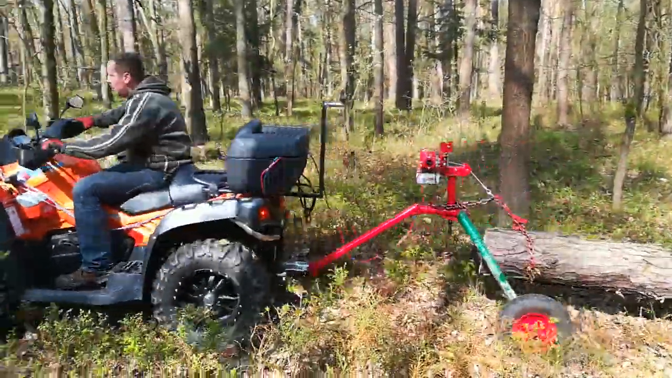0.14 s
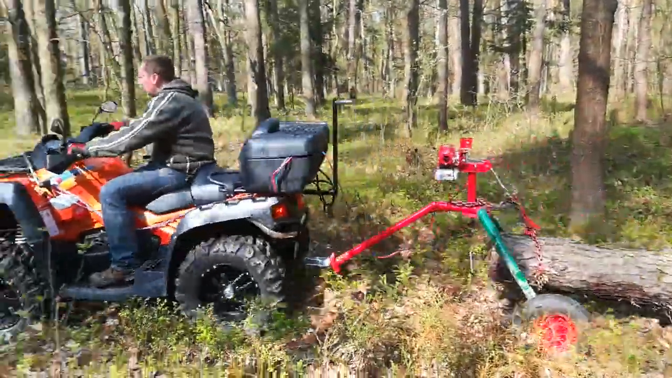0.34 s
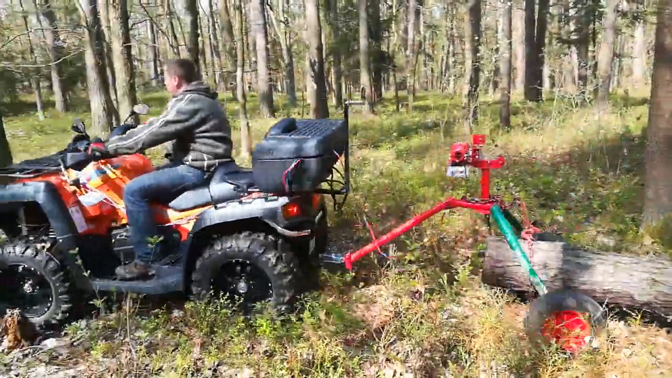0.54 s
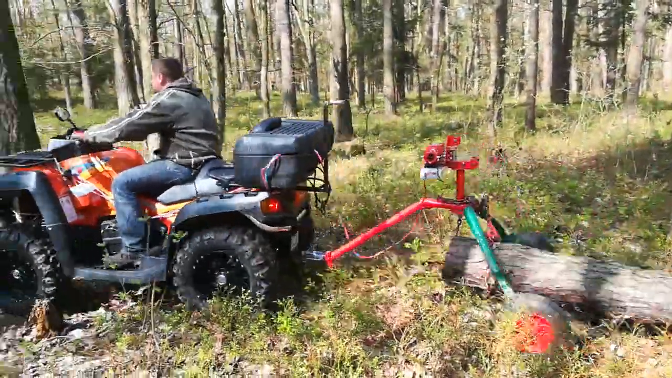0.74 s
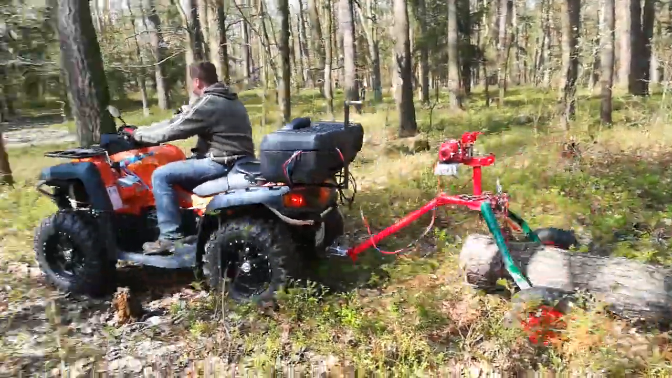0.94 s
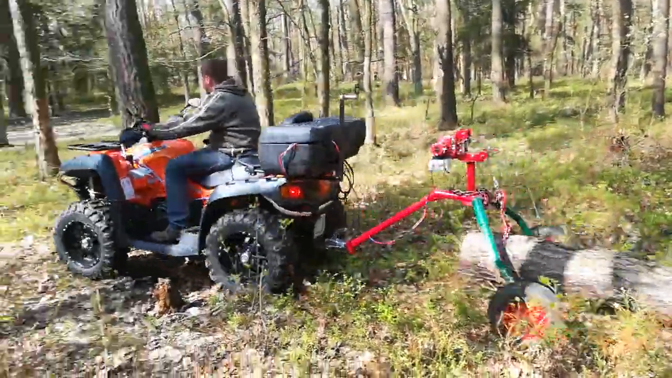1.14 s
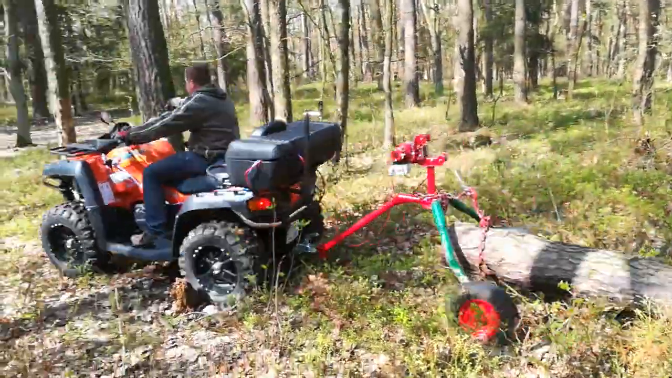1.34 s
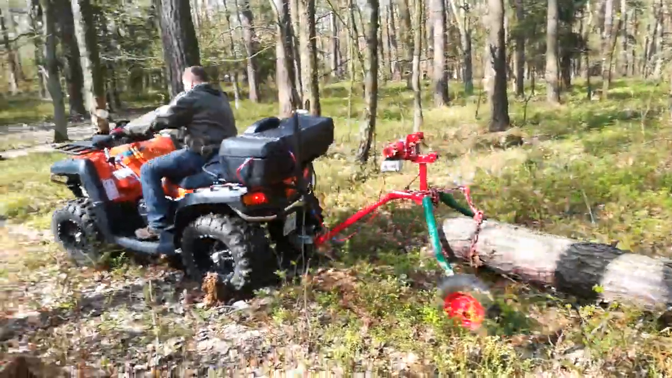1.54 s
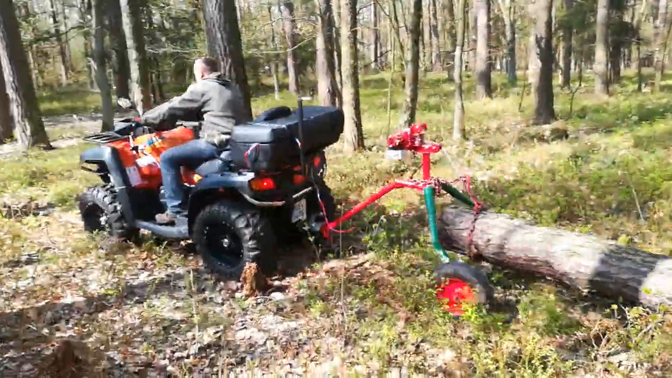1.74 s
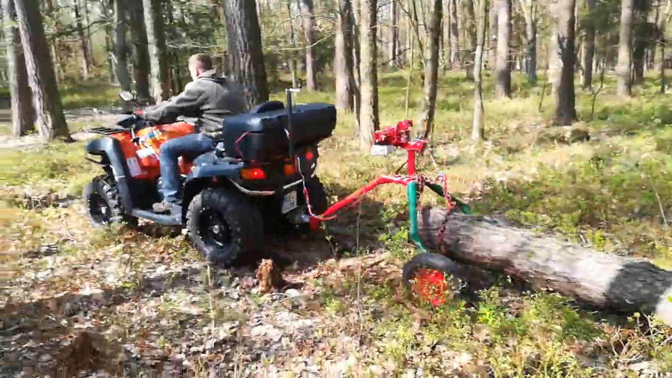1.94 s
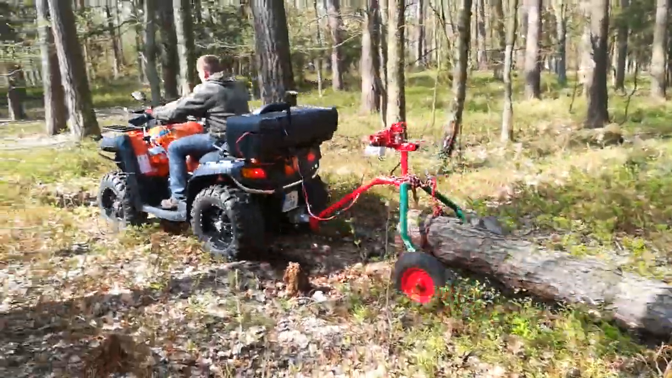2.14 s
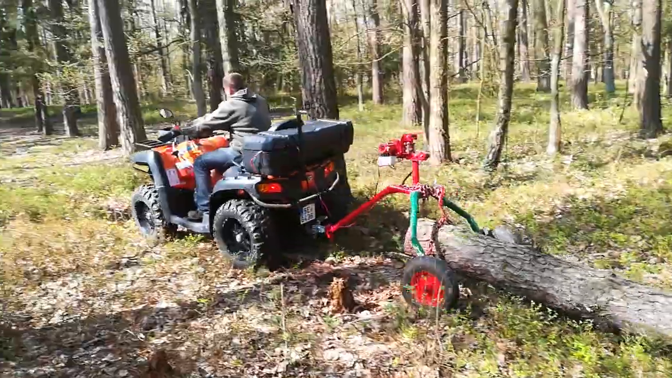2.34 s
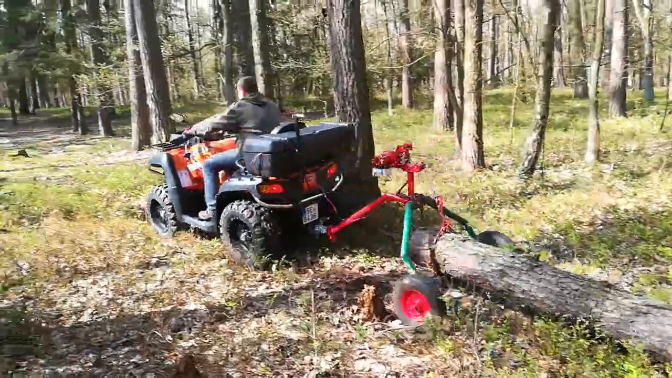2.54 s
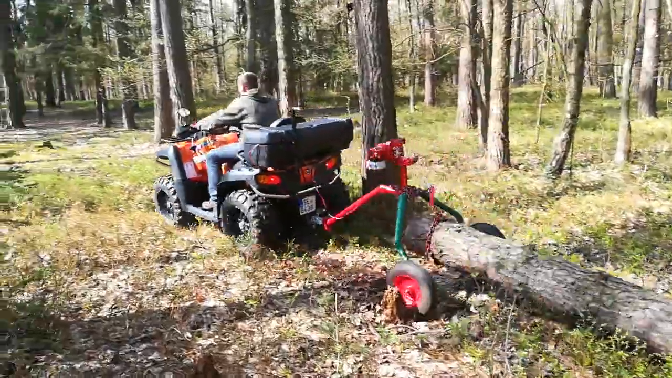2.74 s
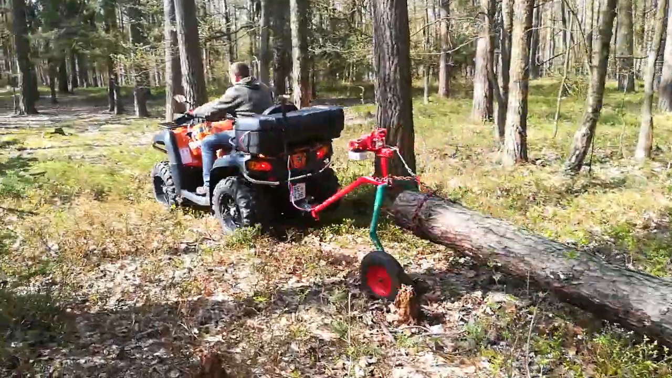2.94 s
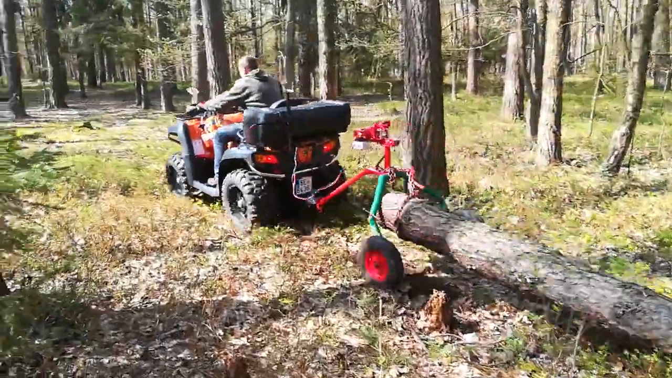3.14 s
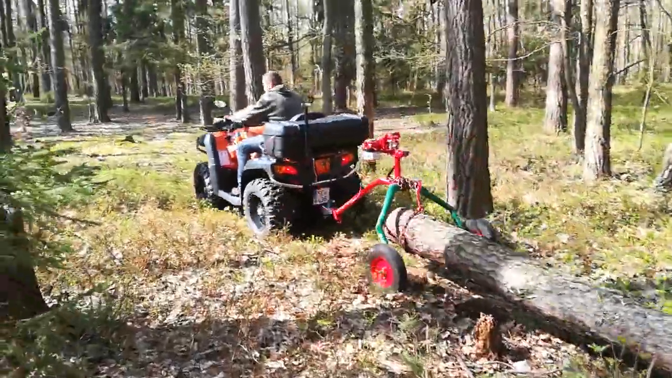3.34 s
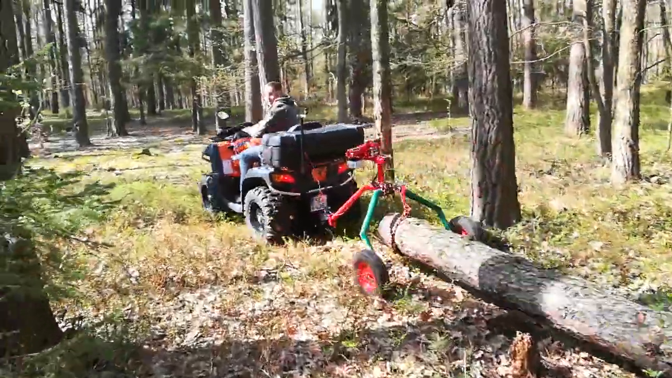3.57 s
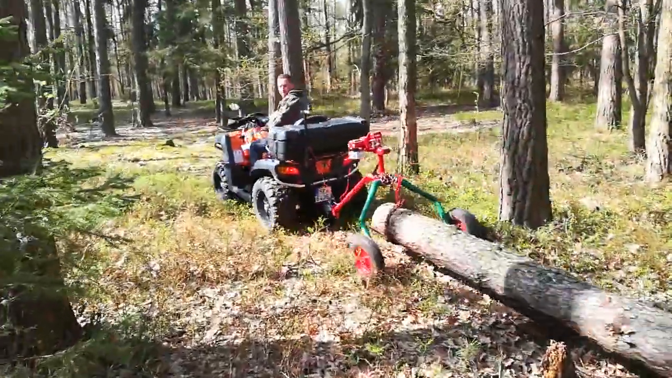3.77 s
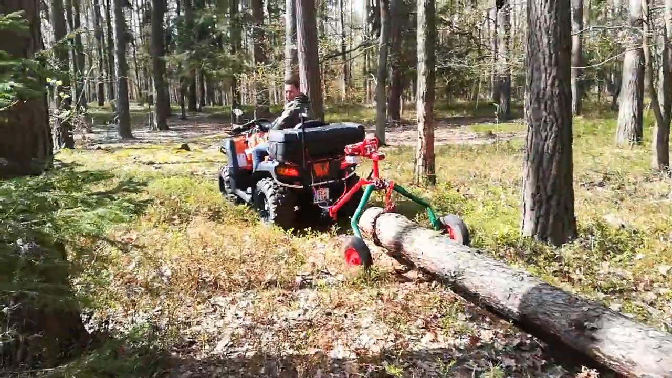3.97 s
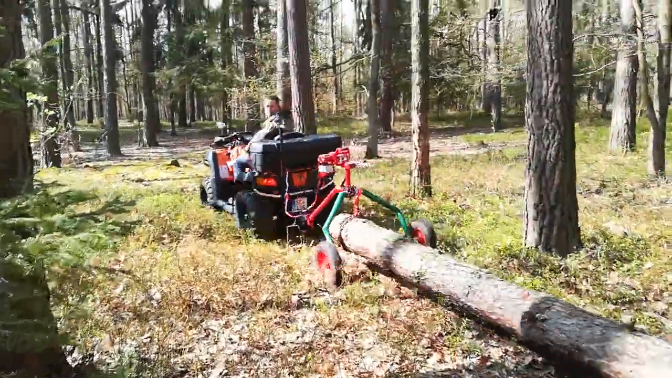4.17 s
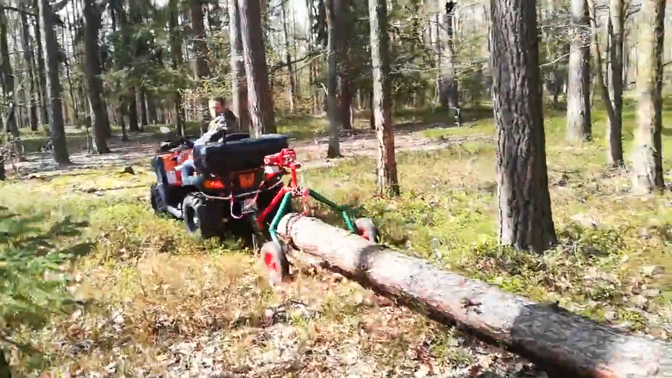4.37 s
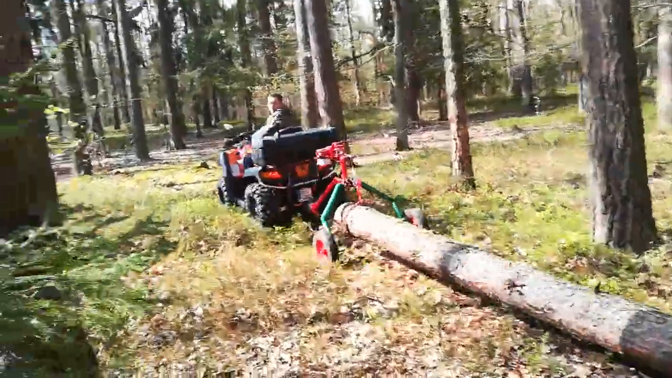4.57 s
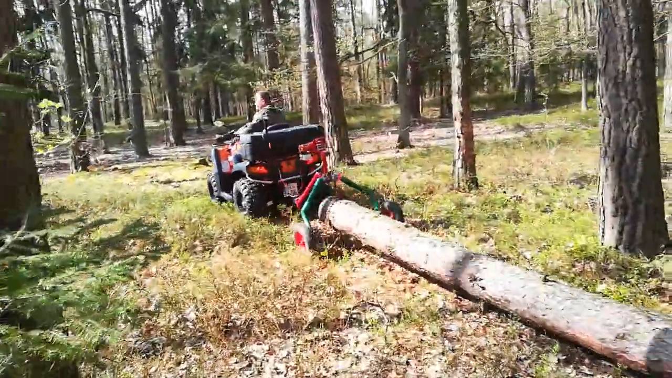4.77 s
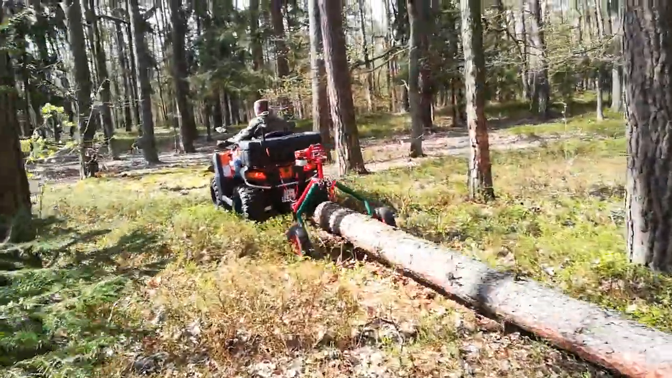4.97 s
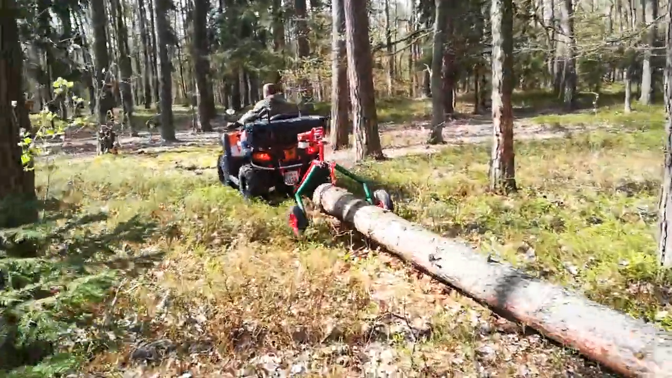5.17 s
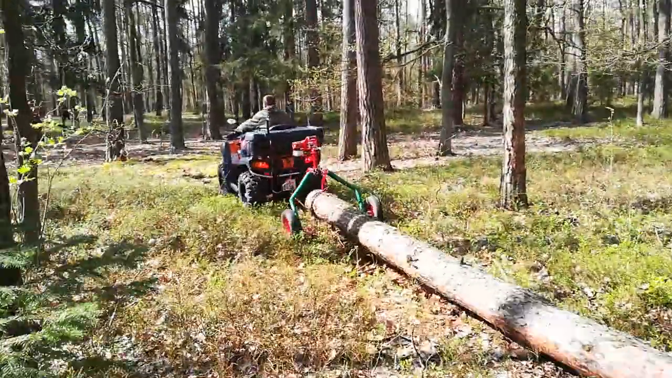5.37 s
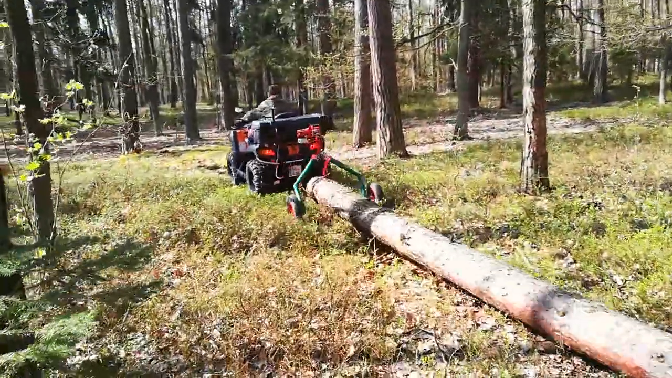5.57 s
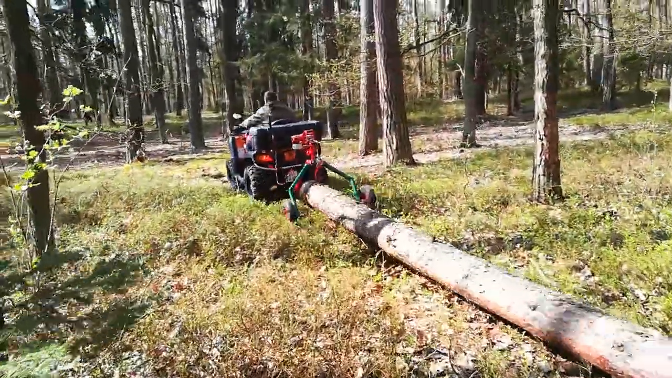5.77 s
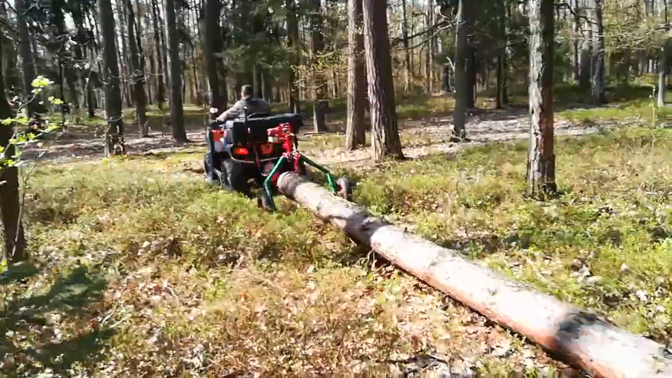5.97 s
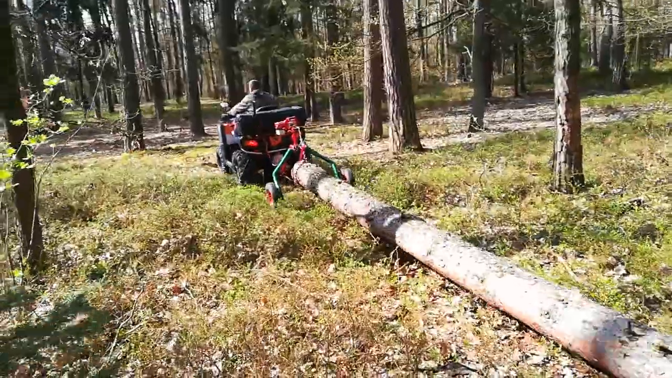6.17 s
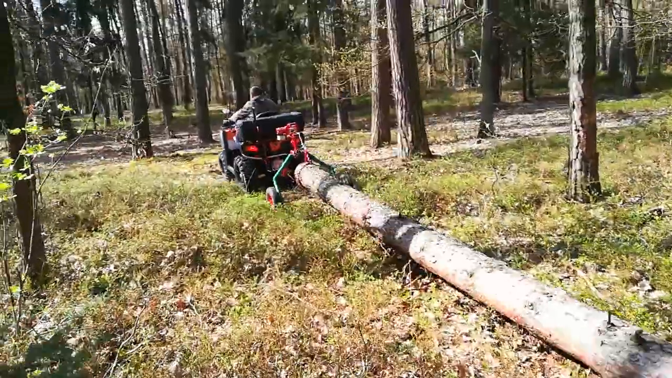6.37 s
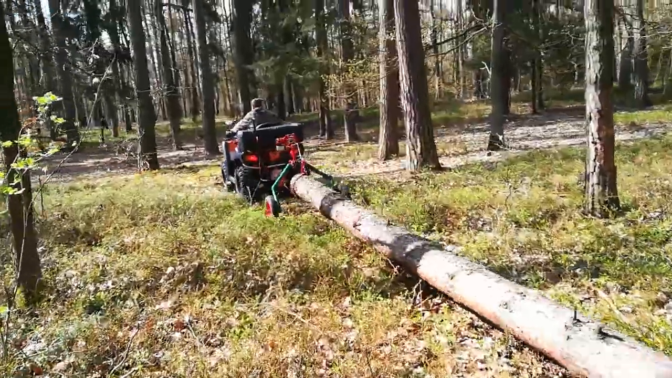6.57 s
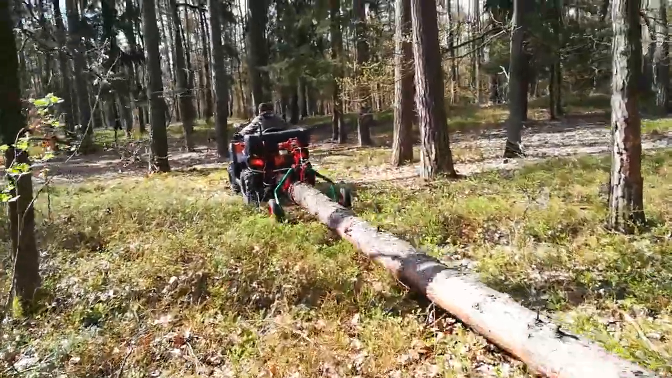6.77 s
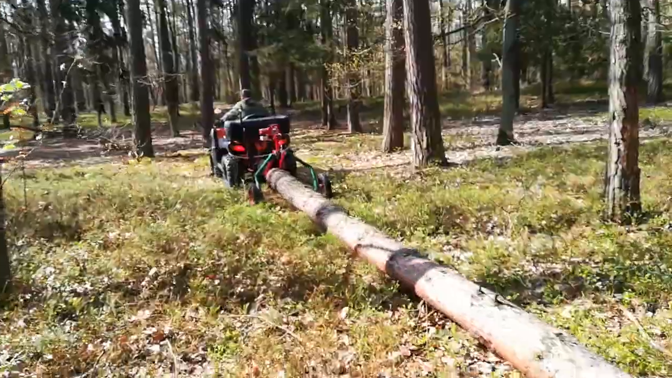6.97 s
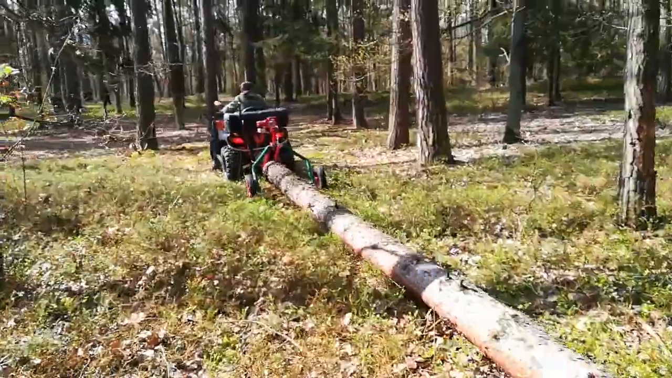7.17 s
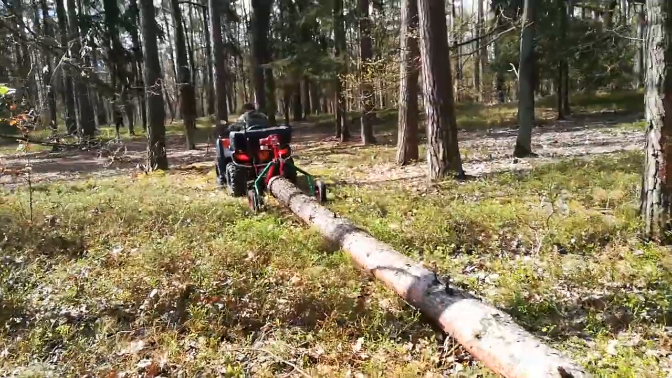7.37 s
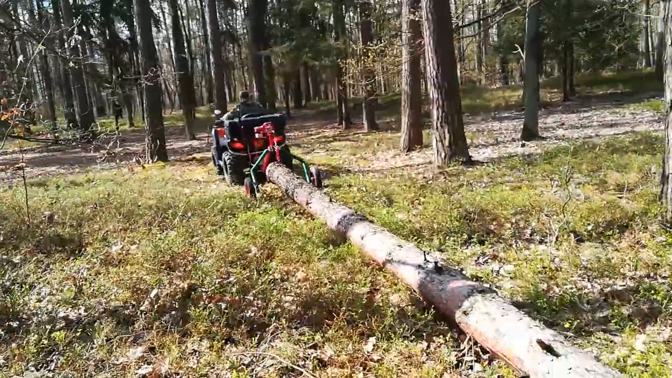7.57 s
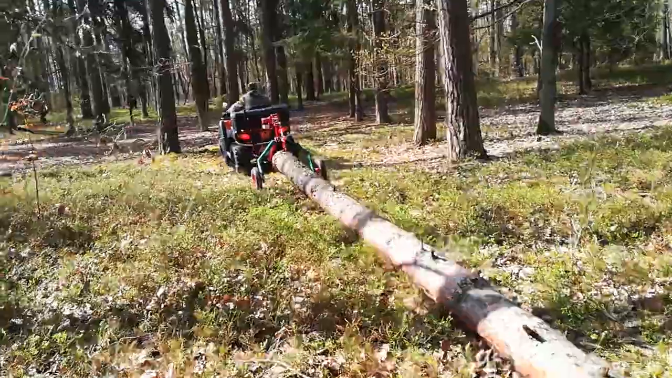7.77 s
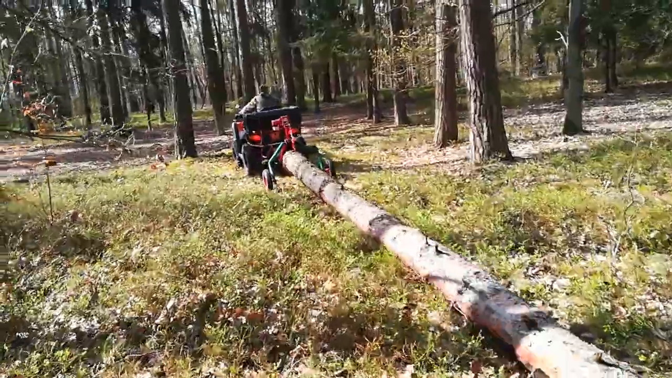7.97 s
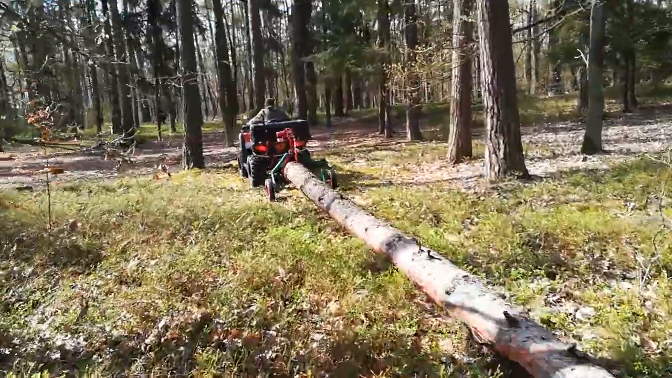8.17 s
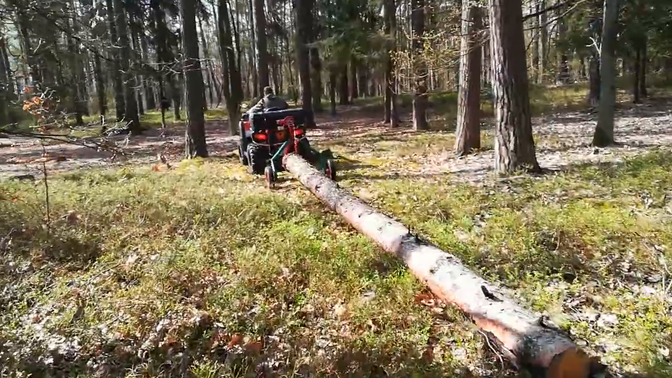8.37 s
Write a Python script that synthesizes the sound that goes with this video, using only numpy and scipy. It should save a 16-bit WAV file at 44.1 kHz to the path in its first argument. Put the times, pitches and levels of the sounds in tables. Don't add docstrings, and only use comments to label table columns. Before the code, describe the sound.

From 0 s a two-cylinder quad bike throbs about three metres away, a fast, low, smooth exhaust pulse with a buzz in the first half second, rough mechanical clatter and thin gear whines. Bright, grainy leaf rustle runs beneath as tyres and a towed log cross dry forest litter. Twigs snap at about 0.3, 0.5 and 1.4 s. The pitch rises slightly by 1.5 s, sags around 2 s, then climbs to its highest near 4.3 s. Brush crunches near 3 s, and a hard twig crack comes at 3.4 s. A tight cluster of crunches follows at 4.7-4.9 s, with an uneven throb. By 5.7 s the revs have dropped and the bike is farther off, its clatter softened. Rustling thins, snaps continue at 6.5 and 8.3 s, and the engine still drones quietly at the 8.4 s end. Open-air stereo, no obvious echo.

```python
import sys
import numpy as np
from scipy import signal
from scipy.io import wavfile

SR = 44100
rng = np.random.default_rng(int(sys.argv[2]) if len(sys.argv) > 2 else 0)


def to_wav(s):
    ch = np.atleast_2d(s).T
    pcm = np.round(np.clip(ch, -1, 1) * 32767)
    wavfile.write(sys.argv[1], SR, pcm.astype(np.int16))


def volts_from_decibels(level):
    exponent = np.asarray(level, float) / 20
    return 10 ** exponent


N = 370881
TIME = np.arange(N) / SR


def in_time(rows):
    s, *columns = np.transpose(rows)
    return [np.interp(TIME, s, c) for c in columns]


def at_hz(points, hz):
    points_hz, value = np.transpose(points)
    return np.interp(np.log(hz), np.log(points_hz), value)


def rms_one(x):
    return x / np.sqrt(np.mean(x ** 2) + 1e-20)


def drift(rate_hz):
    pole = np.exp(-80 * np.pi * rate_hz / SR)
    white = rng.standard_normal(N // 40 + 2002)
    slow = signal.lfilter([1], [1, -2 * pole, pole * pole], white)[2000:]
    return np.interp(np.arange(N) / 40, np.arange(len(slow)), rms_one(slow))


def band(x, low_hz, high_hz):
    sos = signal.butter(2, [low_hz, min(high_hz, SR / 2.2)], "band", fs=SR, output="sos")
    return signal.sosfilt(sos, x)


def sides(pan_db):
    return volts_from_decibels(np.array([[pan_db / 2], [-pan_db / 2]]))


# centre_hz, likeness_0_to_1
LIKENESS = [(60, .99), (290, .97), (640, .72), (1400, .62), (3100, .25), (6800, .2), (15000, .2)]
# centre_hz, lean_db
LEAN = [(200, 0), (380, -.5), (700, 2.4), (1300, -1.7), (2400, 0), (4400, 2.5), (8100, 1.8), (15000, 1.5)]


def banded(white, edges_hz, level_db, patchy_db):
    out, together = 0, drift(0.59)
    for k, (low_hz, high_hz) in enumerate(zip(edges_hz, edges_hz[1:])):
        mid, side = band(white[k % 2], low_hz, high_hz)
        hz = np.sqrt(low_hz * high_hz)
        alike = at_hz(LIKENESS, hz)
        gain = volts_from_decibels(level_db(hz) + patchy_db * (.3 * together + drift(19.7)))
        stereo = np.sqrt(1 + alike) * mid + np.sqrt(1 - alike) * side * [[1], [-1]]
        out = out + sides(at_hz(LEAN, hz)) * gain * stereo
    return out


# time_s, rustle_db, brightness_db
LITTER = [(0.0, -40, -6.5), (1.83, -42.5, -5.5), (2.25, -39.5, -4), (2.67, -44, -3), (2.95, -43.5, -6),
          (3.32, -40.5, -1), (4.14, -44.5, -5), (4.36, -45.5, -5), (4.71, -46, -8), (4.97, -45.5, -4),
          (5.46, -50, -6), (6.79, -49, -7.5), (7.12, -45.5, -2.5), (7.61, -47, -4.5), (8.06, -44.5, -3),
          (8.29, -47.5, -1), (8.41, -48.5, -6)]
# centre_hz, level_db_per_hz
LEAVES = [(1290, -20), (2200, -21), (2680, -13), (3130, -7), (4060, -7.5), (6900, -4), (10100, -12),
          (14900, -14.5), (15500, -15)]


def litter():
    rustle_db, bright_db = in_time(LITTER)
    rustle_db = rustle_db + .7 * drift(11) + 12.0
    bright_db = bright_db + 2.0 * drift(23) - 2.0
    sizes = volts_from_decibels(3.0 * np.minimum(rng.exponential(1, N), 3.5))
    cracks_per_s = 700 * volts_from_decibels(4.0 * drift(14))
    cracks = sizes * (rng.random(N) < cracks_per_s / SR)
    white = rng.standard_normal((2, 2, N)) * (1 + 1.6 * cracks)

    def level_db(hz):
        octaves = np.clip(np.log2(hz / 7000), 0, .85)
        return at_hz(LEAVES, hz) + rustle_db + bright_db * octaves

    noise = banded(white, np.geomspace(2200, 17000, 17), level_db, .7)
    return signal.sosfilt(signal.ellip(10, 1, 60, 15600, fs=SR, output="sos"), noise)


# start_s, length_s, rms_db, centre_hz
CRUNCHES = [(2.995, .05, -48, 4200), (4.834, .02, -40, 3800), (4.836, .018, -41, 4700),
            (4.885, .02, -43, 3400), (4.9, .04, -46, 5300), (4.842, .016, -42, 5200),
            (4.868, .022, -41, 5800), (4.87, .06, -45, 4300), (4.825, .06, -54, 15300),
            (2.15, .12, -46, 11000), (4.689, .009, -37, 6400), (3.03, .12, -56, 15300)]


def crunches():
    out, t = np.zeros((2, N)), TIME[:8000]
    for start_s, length_s, rms_db, hz in CRUNCHES:
        at = round(start_s * SR)
        grains = rng.standard_normal((2, 8000)) * volts_from_decibels(5.5 * drift(200)[:8000])
        fade = np.exp(-(t / length_s) ** 2)
        burst = band(grains * fade, max(hz / 1.07, hz - 400), min(hz * 1.07, 15500))
        out[:, at:at + 8000] += volts_from_decibels(rms_db) * rms_one(burst) * np.sqrt(length_s * SR / 8000)
    return out


# time_s, peak_db, centre_hz, left_over_right_db, crack_over_ring_db
SNAPS = [(0.3426, -21.5, 6050, 10, 11), (0.5222, -21, 5200, 6, -1), (1.267, -28, 7020, 3, -11),
         (1.3852, -20.5, 6620, 5, 2), (1.7649, -30, 6400, 5, -4), (2.648, -24.5, 7000, 6, 0),
         (2.9854, -26, 5470, 4, -8), (3.4015, -16, 6600, 6, 6), (4.3255, -28, 6830, 6, -14.5),
         (4.8745, -24.5, 4262, -1, 3), (4.9856, -29, 7110, 2, -5), (5.1408, -23, 6400, -4, 2),
         (5.1686, -24, 6680, 1, 8), (5.384, -26, 6410, -3, 5), (5.7345, -32, 2550, 8, 0),
         (6.2861, -36, 2700, 0, -3), (6.4834, -21.5, 6500, 8.5, 1), (6.7446, -32, 7110, 6, 6),
         (6.8886, -28, 5710, 2, -1), (8.0834, -29, 6275, 8, -4), (8.285, -20, 6100, 3, 4)]


def snaps():
    crack_t60_s, ring_t60_s = .002, .013
    out, t = np.zeros((2, N + 2000)), TIME[:2000]
    for time_s, peak_db, hz, pan_db, crack_db in SNAPS:
        noise = rng.standard_normal((2, 2000))
        crack = band(noise * volts_from_decibels(-60 * t / crack_t60_s), 2300, 12000)
        ring = band(noise * volts_from_decibels(-60 * t / ring_t60_s), hz / 1.25, hz * 1.15)
        both = volts_from_decibels(crack_db) * crack + ring
        at = round(time_s * SR)
        out[:, at:at + 2000] += volts_from_decibels(peak_db) * sides(pan_db) * both / np.abs(both).max() * 2.04
    return out[:, :N]


# centre_hz, level_db_per_hz
RUMBLE = [(25, 15), (60, 3), (100, 6.5), (200, -5), (300, -8), (420, -8)]


def pipe_flow(level_db):
    white = rng.standard_normal((2, 2, N))
    flow = banded(white, np.geomspace(62, 400, 7), lambda hz: at_hz(RUMBLE, hz), 1.7)
    return volts_from_decibels(level_db - 12.0) * rms_one(flow)


# time_s, tail_share_0_to_1
TURN = [(0, 0.21), (2.2, 0.56), (2.8, 0.54), (5.0, 0.91), (8.41, 0.98)]


def tail_on():
    return in_time(TURN)[0]


# time_s, distance_m
DISTANCE = [(0, 3.3), (.6, 3.65), (1.2, 4.34), (1.9, 4.7), (2.6, 5.9), (4.5, 9.1), (6.0, 12.0),
            (8.41, 12.9)]
# centre_hz, level_db_per_hz
CASE_SIDE_ON = [(240, -37), (400, 9), (448, -21.5), (601, -21), (663, -17), (925, -6), (1200, -19),
                (1360, -18.5), (1530, -18.5), (1730, -23.5), (2230, -21.5), (2420, -24.5), (2800, -29),
                (3640, -48), (6160, -120)]
# centre_hz, level_db_per_hz
CASE_REAR = [(240, -38), (400, -5.5), (482, -16), (507, -20), (606, -6), (636, -14), (685, -22),
             (774, -11.5), (888, -21), (1210, -7), (1380, -10), (1620, -15.5), (1830, -10), (2020, -16.5),
             (2800, -20), (3640, -40), (6160, -120)]


def engine_case(angle):
    loss_db = 20 * np.log10(in_time(DISTANCE)[0])
    boom_db = -10.0 - loss_db
    rattle_db = -6.5 - 1.181 * loss_db
    tail = tail_on()
    firing = np.exp(1.3 * (np.cos(2 * angle - .9) - 1))
    uneven = 1.2 + (.8 - .55 * tail) * np.cos(angle - .45)
    knock = 1.2 + firing * uneven

    def level_db(hz):
        colour_db = (1 - tail) * at_hz(CASE_SIDE_ON, hz) + tail * at_hz(CASE_REAR, hz)
        return colour_db + (boom_db if hz < 1000 else rattle_db)

    white = rng.standard_normal((2, 2, N))
    return banded(white * knock, np.geomspace(500, 2600, 22), level_db, 1.0)


# start_s, end_s, first_order, last_order, rms_db
WHINES = [(0.152, 0.945, 54.6, 58, -49.5), (2.702, 3.203, 41.5, 43, -52), (7.4, 8.1, 38.3, 37, -58.5),
          (1.495, 1.85, 41.3, 41.6, -46.5), (1.499, 1.949, 31.5, 32.0, -50.5),
          (3.298, 3.657, 43.3, 39, -51), (2.098, 2.504, 44.2, 42, -53), (3.55, 4.14, 34.2, 36, -50),
          (4.088, 4.873, 35.8, 37.5, -48), (4.706, 5.252, 37.5, 38.2, -53), (5.298, 6.091, 43.2, 48, -55.5),
          (6.501, 7.205, 50.0, 48.0, -57.5)]


def whines(cycle_hz, angle):
    out = np.zeros(N)
    for start_s, end_s, first, last, rms_db in WHINES:
        on = (TIME > start_s) & (TIME < end_s)
        part = (TIME[on] - start_s) / (end_s - start_s)
        order = first + (last - first) * part
        phase = 2 * np.pi * np.cumsum(order * cycle_hz[on]) / SR
        swell = np.sin(np.pi * part) ** 0.25 * (1 + 0.22 * np.cos(2 * angle[on]))
        waver_rad = 0.46 * min(first / 40, 1) * drift(17.4)[on]
        out[on] += swell * volts_from_decibels(rms_db + 0.57 * drift(7.5)[on]) * np.cos(phase + waver_rad)
    return np.sqrt(2) * out


# centre_hz, gain_db
PIPE_SIDE_ON = [(58, 1.5), (105, 14), (122, 0.8), (160, -2.5), (185, -1.7), (210, 5), (240, -3.5),
                (310, -22)]
# centre_hz, gain_db
PIPE_REAR = [(65, -1), (120, 3), (145, 2.2), (182, 1.7), (215, 3.5), (245, -5), (290, -13.5), (350, -31)]


def low_orders(cycle_hz, level_db, bright_db, uneven_db):
    tail = tail_on()

    def piped(k):
        hz = k * cycle_hz
        pipe_db = (1 - tail) * at_hz(PIPE_SIDE_ON, hz) + tail * at_hz(PIPE_REAR, hz)
        return level_db + bright_db * np.log2(hz / 120) + pipe_db

    levels = {k: piped(k) for k in range(2, 11, 2)}
    levels[7], levels[9] = piped(7) - 7, piped(9) - 1.1
    levels[1] = level_db - 9.6 + .3 * uneven_db
    levels[3], levels[5] = level_db + uneven_db - 1.5, level_db + uneven_db + .5
    return levels


def chamber_phase(hz):
    centre_hz, width_hz, turn_rad, start_rad = 180, 35, 1.6, 2.55
    return start_rad + turn_rad * np.arctan((hz - centre_hz) / width_hz)


# centre_hz, gain_db
MUFFLER = [(300, -25), (340, -33), (400, -39), (480, -38), (560, -33), (700, -35), (900, -38), (1000, -46)]
# start_s, end_s, order, rms_db
SINGING = [
    (-.4, .55, 11, -39.5),
    (-.3, .55, 12, -47),
    (.7, 2.5, 11, -49),
    (1.8, 2.4, 11, -45),
    (3.4, 5.1, 16, -53),
    (3.6, 4.9, 20, -58),
    (2.5, 3.3, 27, -55),
    (2.6, 3.6, 14, -57),
    (-.3, .5, 20, -51),
    (4.4, 5.3, 3, -35),
]


def exhaust(cycle_hz, angle, levels):
    stand_out_db = 5.0 - 4.5 * tail_on()
    top_db = (levels[7] + levels[8]) / 2
    for k in range(11, 33):
        muffled_db = levels[2] + at_hz(MUFFLER, k * cycle_hz)
        valve_db = -3 * (k % 2) + 5 * (k % 4 == 0)
        levels[k] = muffled_db + valve_db + 1.3 * (cycle_hz - 33) + stand_out_db
    for k, under_db in zip((11, 12), (22.0, 26.9)):
        levels[k] = np.maximum(levels[k], top_db - under_db)
    for start_s, end_s, k, rms_db in SINGING:
        swell = np.sin(np.pi * np.clip((TIME - start_s) / (end_s - start_s), 0, 1))
        levels[k] = np.maximum(levels[k], rms_db + 10 * np.log10(swell + 1e-9))
    out = 0
    for k, db in levels.items():
        rough_db = (.4 + .06 * k) * drift(14)
        sign = -1 if k == 1 else 1
        odd_lag_rad = .15 * (k % 2) * max(k - 5, 0) ** 2
        scatter_rad = rng.uniform(0, 2 * np.pi) * (k > 12)
        jitter_rad = .1 * np.roll(rough_db, N // 2)
        phase = k * angle + chamber_phase(k * cycle_hz) - odd_lag_rad + scatter_rad + jitter_rad
        out = out + sign * volts_from_decibels(db + rough_db) * np.cos(phase)
    return np.sqrt(2) * out


# time_s, cycle_hz, level_db, brightness_db_per_octave, cylinder_unevenness_db
ENGINE = [(0.0, 29.3, -31.4, -2.9, -14.2), (0.7, 27.6, -30.6, -1.6, -21.5), (1.1, 28.9, -29.0, 0.3, -23.4),
          (1.45, 30.2, -28.9, 0.3, -19.5), (1.8, 27.5, -30.0, 0.9, -20.4), (2.06, 26.4, -31.2, 1.7, -7.8),
          (2.4, 29.8, -31.3, 1.0, -12.7), (2.69, 32.8, -31.6, 1.6, -11.8), (3.35, 32.4, -32.9, 0.6, -13.5),
          (3.7, 34.7, -33.8, 1.1, -5.4), (4.31, 36.0, -35.3, -1.3, -4.1), (4.72, 35.1, -36.5, -1.4, 1.0),
          (5.74, 30.3, -35.7, -0.8, -18.4), (6.25, 31.0, -37.7, -0.4, -16.9),
          (6.7, 30.3, -36.8, -0.6, -23.3), (7.4, 32.4, -37.6, -0.2, -11.1), (7.93, 33.0, -38.9, 0.6, -6.7),
          (8.41, 30.9, -37.2, -0.1, -18.8)]


def scene():
    pipe_lag_samples, port_lag_samples = 2, 4
    cycle_hz, level_db, bright_db, uneven_db = in_time(ENGINE)
    angle = 2 * np.pi * np.cumsum(cycle_hz) / SR
    ground = litter() + crunches() + snaps()
    noise = pipe_flow(level_db) + engine_case(angle)
    levels = low_orders(cycle_hz, level_db, bright_db, uneven_db)
    tone = whines(cycle_hz, angle) + exhaust(cycle_hz, angle, levels)
    sway = .04 * drift(3) * [[1], [-1]]
    throb = np.array([tone, np.roll(tone, pipe_lag_samples)]) * (1 + sway)
    left, right = throb + noise + ground
    return np.array([left, np.roll(right, port_lag_samples)])


def band_limit(x):
    return signal.sosfilt(signal.butter(12, 16520, fs=SR, output="sos"), x)


def record(dry):
    return band_limit(dry)


dry = scene()
out = record(dry)
to_wav(out)
```